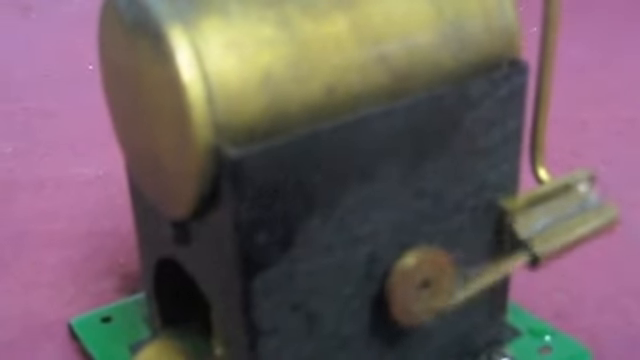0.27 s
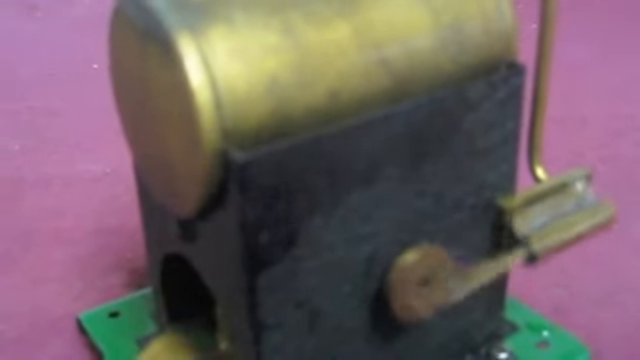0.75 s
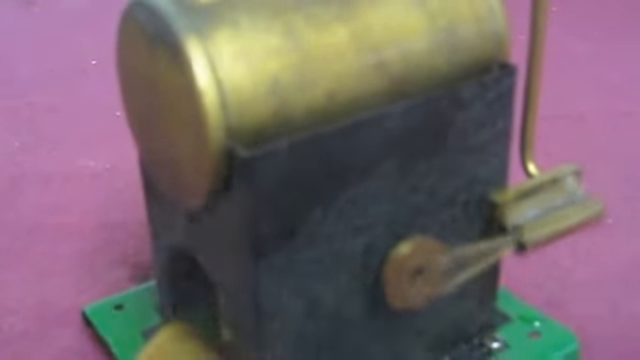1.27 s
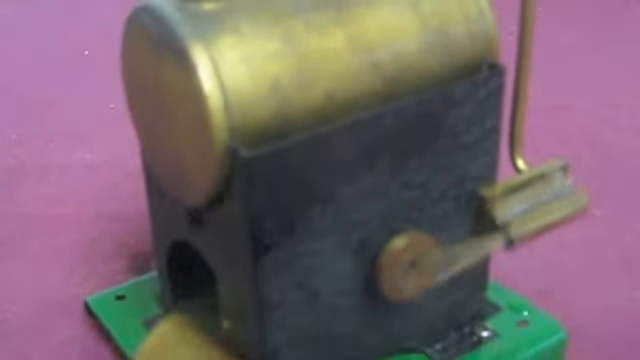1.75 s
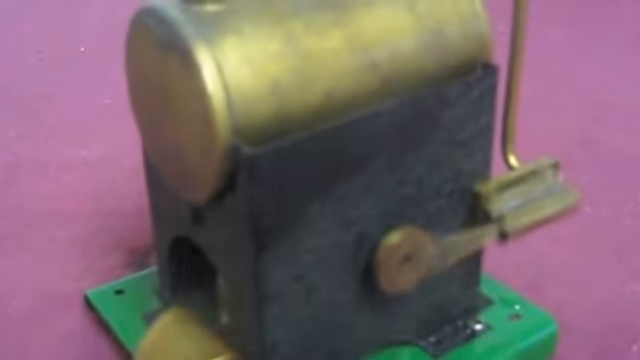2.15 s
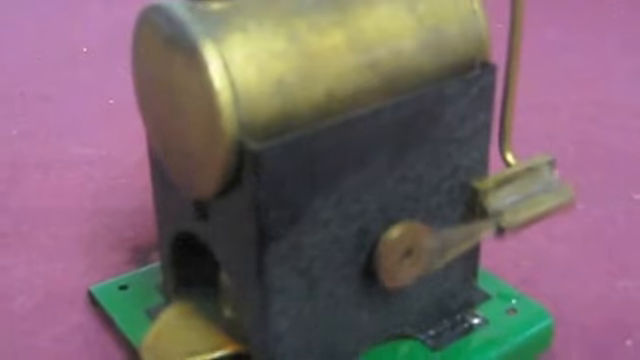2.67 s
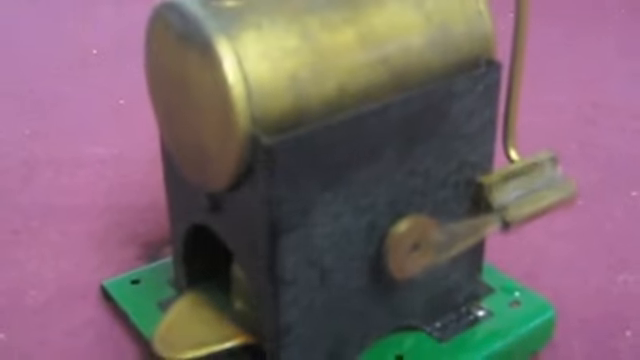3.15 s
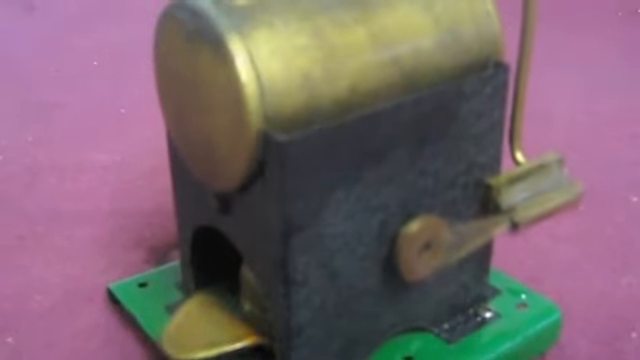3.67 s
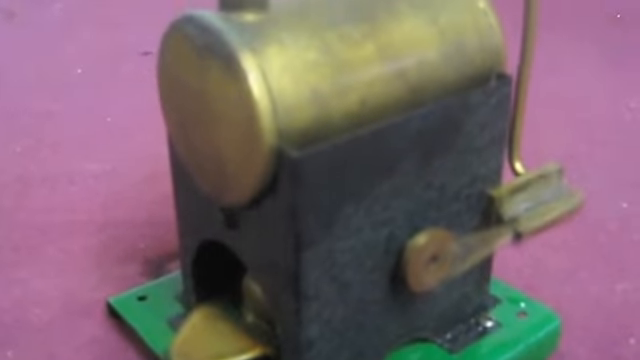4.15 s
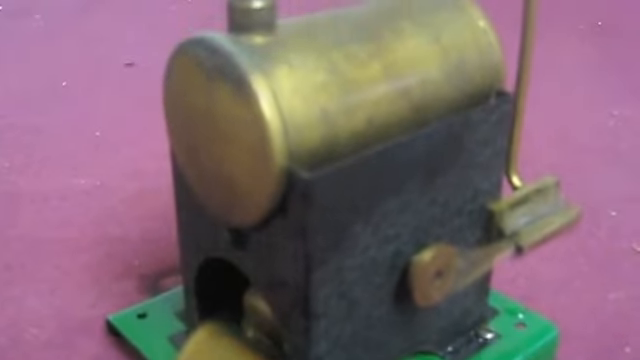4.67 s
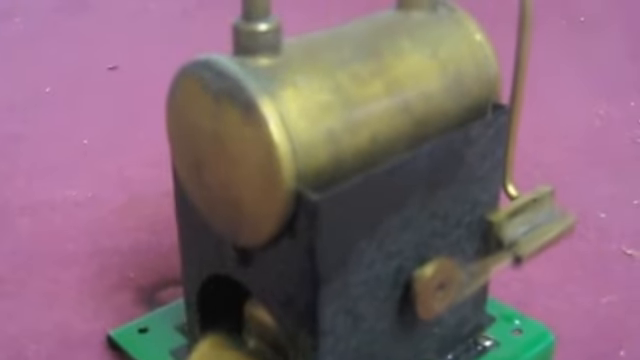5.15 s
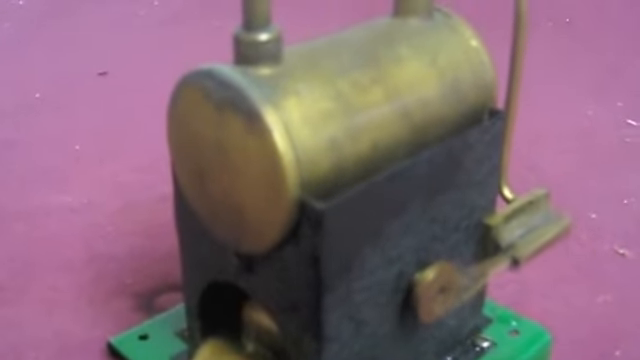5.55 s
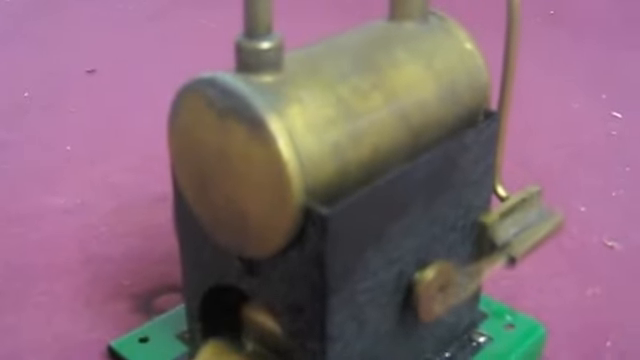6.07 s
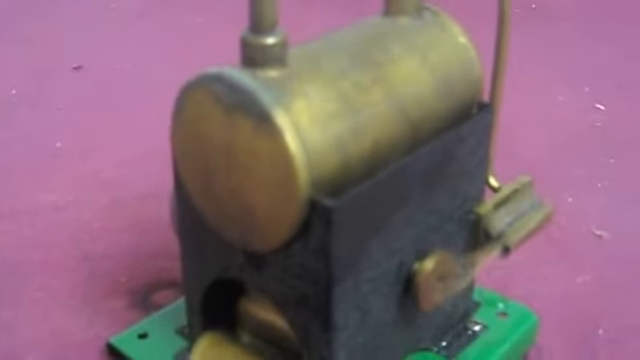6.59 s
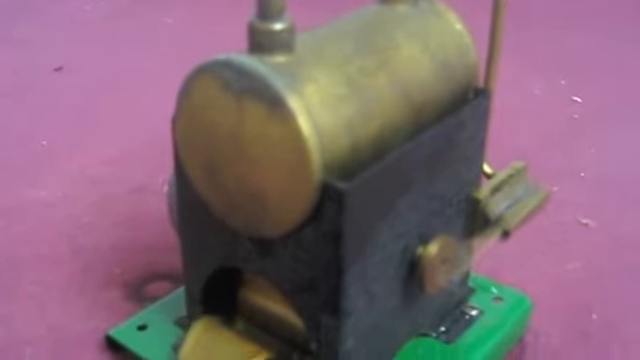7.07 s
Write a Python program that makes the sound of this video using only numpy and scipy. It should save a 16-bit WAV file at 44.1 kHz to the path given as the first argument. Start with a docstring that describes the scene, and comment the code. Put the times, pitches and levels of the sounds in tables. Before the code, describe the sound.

A toy steam engine speeds up close by, sharp wet spits quickening into a buzzing clatter, then clearing into rapid hissing chuffs with a rising whirr.

```python
"""On a table in a small room, close to the microphone, a toy steam engine with one cylinder picks up speed.
At first each exhaust stroke spits condensed water; once the cylinder clears, wet hissing chuffs remain.
Steam is shaped noise: gated by the crank at the exhaust, steady where it leaks at the port face.
Clicks locked to the crank make the water spits, the piston knock, the inlet hiss and a low whirr.
Resonators ring as firebox, boiler and whirr; sines at multiples of the crank speed hum in the table."""
import sys
import numpy as np
from scipy import signal
from scipy.fft import rfft, irfft
from scipy.io import wavfile
from scipy.ndimage import uniform_filter1d

SR = 44100
rng = np.random.default_rng(int(sys.argv[2]) if len(sys.argv) > 2 else 0)


def wav_out(sig):
    """Save sig, one row per channel (or a flat mono array), as 16-bit PCM at SR to the path in sys.argv[1]."""
    wavfile.write(sys.argv[1], SR, np.round(np.clip(np.atleast_2d(sig).T, -1, 1) * 32767).astype(np.int16))


N = 322812
TIME_S = np.arange(N) / SR

# the crank gathers speed, ever more slowly: (time [s], speed [turns/s])
CRANK_SPEED = [(0, 15.933), (.75, 20.343), (1.75, 25.214), (2.75, 29.084), (3, 29.87), (3.75, 32.844),
               (5.25, 36.751), (5.75, 38.416), (6.5, 39.784), (7.32, 40.568)]
START_TURN = 0.113   # crank angle at the start [turns]
WORKING_SPEED = 38   # [turns/s]
# the cylinder is flooded at first, then blows itself clear: when, and how long the steam takes to change [s]
CLEARS_S, CLEARING_S = 2.3, 0.04


def from_db(db):
    """Decibels to an amplitude factor."""
    return 10 ** (np.asarray(db) / 20)


def columns_at(rows, where):
    """Every further column of a table, read along its first one."""
    first, *columns = np.transpose(rows)
    return [np.interp(where, first, column) for column in columns]


def in_time(rows):
    """Every column of a table that runs in seconds, at each sample."""
    return columns_at(rows, TIME_S)


def with_speed(working_db, slope_db):
    """A level that grows with the speed of the crank, by slope_db per turn/s."""
    speed, = in_time(CRANK_SPEED)
    return working_db + slope_db * (speed - WORKING_SPEED)


def colour(x, spectrum):
    """Causal (minimum-phase) filter that leaves the power of white noise unchanged."""
    size = 4096
    hz, db = np.transpose(spectrum)
    bins_hz = np.linspace(1, SR / 2, size // 2 + 1)
    gain = from_db(np.interp(np.log(bins_hz), np.log(hz), db))
    # folding the cepstrum onto positive times gives the minimum phase
    cepstrum = irfft(np.log(gain))
    cepstrum[1:size // 2] *= 2
    cepstrum[size // 2 + 1:] = 0
    response = irfft(np.exp(rfft(cepstrum)))
    return signal.fftconvolve(x, response / np.linalg.norm(response))[:N]


def resonance(x, hz, width_hz):
    """Two-pole band-pass with a gain of about 1 on top; a narrow one rings long."""
    r = np.exp(-np.pi * width_hz / SR)
    feed = np.array([1, 0, -1]) * (1 - r * r) / 2
    feedback = [1, -2 * r * np.cos(2 * np.pi * hz / SR), r * r]
    return signal.lfilter(feed, feedback, x + 1e-18)


def fade(clicks, decay_s):
    """Each click becomes a step that dies away exponentially."""
    return signal.lfilter([1], [1, -np.exp(-1 / (decay_s * SR))], clicks + 1e-18)


def sputter(rough_db, grain_hz):
    """Jet noise broken into short spurts by droplets; rms 1."""
    spurts = np.clip(rng.standard_normal(N), -2, 2)
    swing = np.interp(np.arange(N) * grain_hz / SR, np.arange(N), spurts)
    x = rng.standard_normal(N) * from_db(rough_db * swing)
    return x / x.std()


def per_turn(turns, spread_db):
    """A random strength for each turn: no two strokes are equally strong."""
    strengths = from_db(spread_db * rng.standard_normal(size=400))
    return strengths[np.maximum(turns, 0).astype(int)]


def once_a_turn(turns, angle):
    """A unit click each time the crank passes an angle (in turns)."""
    passed = np.floor(turns - angle)
    return np.diff(passed, prepend=passed[0])


def exhaust(turns):
    """The port opens once a turn: a chuff of steam with fine spray in it, whistling as the pressure rises."""
    # flow over one turn: (crank angle [turns], level running clear [dB], level waterlogged [dB])
    chuff_flow = [(0, -10, -11), (.28, -33, -58), (.38, -19, -0.5), (.48, -14.5, 0.5), (.55, -4, 2.5),
                  (.63, 0, 1), (.72, 1, -14.5), (.8, -7.5, -15), (.88, -8, -32), (1, -12, -53)]
    spray_flow = [(0, -15, -21), (.3, -23, -25), (.37, -22, 2), (.49, -15, -14), (.56, -2.5, -1),
                  (.635, -9.5, 9.5), (.68, 5.5, -8), (.74, -5.5, -13), (.82, -12, -7), (.92, -18, -31),
                  (1, -34, -25)]
    # colours of steam and spray: (frequency [Hz], relative level per Hz [dB])
    chuff_colour = [(40, -38), (200, -30.5), (430, -23), (560, -9), (880, -15.5), (1100, -5), (1330, -6.5),
                    (1550, 1), (2700, 1), (4000, -2.5), (4900, -6), (6500, -5.5), (9000, -11), (16000, -32)]
    spray_colour = [(500, -54), (3000, -6.5), (6000, 0.5), (9000, 2), (11500, 8.5), (13200, 4), (14500, 6),
                    (15700, -15)]
    # strength of the chuff: (time [s], level [dB])
    chuff_level = [(0, -22), (2.25, -23), (2.36, -17.5), (2.6, -21.5), (4.5, -23), (4.9, -20.5), (5.6, -21),
                   (5.95, -25), (7.32, -26)]
    # water left in the cylinder: (time [s], share [0-1])
    water_left = [(0, 0.71), (1.2, 0.8), (2.29, 0.43), (2.35, 0.37), (3.1, 0.01), (7.32, 0.3)]
    # lateness of the exhaust: (time [s], crank angle [turns])
    lateness = [(0, 0.0014), (1.3, -0.027), (2.29, -.005), (2.36, -0.0071), (3.1, -0.0046), (4.6, 0.025),
                (5, 0.064), (5.9, 0.04), (7.32, 0.00021)]
    # tones of the exhaust port: (frequency [Hz], width [Hz], level [dB])
    port_tones = [(3800, 370, 1), (6450, 150, 2.5)]
    # how hard the rising pressure blows those tones: (time [s], level [dB])
    port_drive = [(0, -49), (5.8, -44), (6.4, -20.5), (6.8, -17), (7.32, -14)]
    sizzle_hz, sizzle_width_hz = 15350, 1700
    spray_flooded_db, spray_clear_db = -34, -24
    (water,), (late,), (drive_db,) = in_time(water_left), in_time(lateness), in_time(port_drive)
    chuff_db, = in_time(chuff_level)

    def flow(table):
        """Flow through the port, between its clear and its waterlogged course."""
        clear, wet = columns_at(table, (turns - late) % 1)
        return from_db(clear + water * (wet - clear))

    chuff = sputter(rough_db=2.0, grain_hz=1300) * flow(chuff_flow) * per_turn(turns, spread_db=0.4)
    chuff = colour(chuff * from_db(chuff_db), chuff_colour)
    spray_db = np.interp(TIME_S, [CLEARS_S, CLEARS_S + CLEARING_S], [spray_flooded_db, spray_clear_db])
    spray = sputter(rough_db=1.5, grain_hz=979) * flow(spray_flow) * per_turn(turns, spread_db=0.84)
    spray = colour(spray * from_db(spray_db), spray_colour)
    edge = rng.standard_normal(N) * flow(chuff_flow) * from_db(drive_db)
    whistle = sum(from_db(db) * resonance(edge, hz, width_hz) for hz, width_hz, db in port_tones)
    sizzle_db = with_speed(working_db=-16.5, slope_db=0.3)
    mist = sputter(rough_db=3.0, grain_hz=900) * flow(spray_flow) * from_db(sizzle_db)
    sizzle = resonance(mist, sizzle_hz, sizzle_width_hz)
    sizzle = resonance(sizzle, sizzle_hz, sizzle_width_hz)   # second pass for steeper skirts
    return chuff + spray + whistle + sizzle


def port_leak():
    """Steam leaks at the port face: a rough hiss that goes on through the whole turn."""
    # strength of the leak: (time [s], level [dB])
    leak_level = [(0, -34), (.8, -36), (2.27, -37), (2.36, -29.5), (4.6, -32.5), (5.3, -29), (6.3, -33.5),
                  (6.8, -30.5)]
    # its colour: (frequency [Hz], relative level per Hz [dB])
    leak_colour = [(40, -30.5), (200, -29.5), (430, -22.5), (560, -14.5), (880, -15), (1100, -3),
                   (1330, -9), (1550, 0), (2600, -2), (3400, -6.5), (4800, -9), (6500, -11), (11000, -23.5),
                   (16000, -20)]
    leak_db, = in_time(leak_level)
    return from_db(leak_db) * colour(sputter(rough_db=3.5, grain_hz=693), leak_colour)


def pressure_surges():
    """The steam comes in uneven surges: a slow random swing of its gain."""
    surge_db, surges_per_s = 1.24, 7
    swing = np.interp(np.arange(N) * surges_per_s / SR, np.arange(N), rng.standard_normal(N))
    return from_db(surge_db * swing)


def shell(shaking):
    """Tin firebox and brass boiler ring along at their own modes."""
    # modes: (frequency [Hz], width [Hz], level added to the direct sound [dB])
    shell_modes = [(744, 32, 5), (1503, 85, -2.5), (2023, 31, 0), (4200, 120, -0.5), (8890, 380, 3),
                   (9770, 120, 0)]
    return sum(from_db(db) * resonance(shaking, hz, width_hz) for hz, width_hz, db in shell_modes)


def table_hum(turns):
    """The unbalanced crank and piston hum through the table at multiples of the crank speed."""
    # strength of the hum: (time [s], level [dB])
    hum_level = [(0, -85), (2.6, -75), (4.3, -73), (5.4, -65.5), (6.4, -69.5), (7.32, -66.5)]
    # unbalance: (multiple of the crank speed, level [dB])
    hum_orders = [(2, 2.6), (3, .7), (4, -4), (5, -3), (6, -5), (7, 3.7), (8, 3), (9, -.4), (10, -.4),
                  (11, 1), (12, 1.8)]
    # how well the table radiates: (frequency [Hz], level [dB])
    table_response = [(60, -10.6), (80, -.7), (95, -6.7), (112, 8.4), (135, 4), (160, 5.8), (190, 0),
                      (230, 2), (270, -2.4), (330, 2), (400, -3.3), (480, 1.7)]
    (speed,), (hum_db,) = in_time(CRANK_SPEED), in_time(hum_level)
    hum = np.zeros(N)
    for order, order_db in hum_orders:
        table_db, = columns_at(table_response, order * speed)
        phase = 2 * np.pi * (order * turns + rng.random())
        hum += from_db(hum_db + order_db + table_db) * np.sin(phase)
    return np.sqrt(2) * hum   # levels are rms


def room_rumble():
    """Steady low noise of the room."""
    # its colour: (frequency [Hz], relative level per Hz [dB])
    rumble_colour = [(20, 13), (60, 19), (150, -15), (400, -21), (2000, -31)]
    return from_db(-83) * colour(rng.standard_normal(N), rumble_colour)


def room(x):
    """A short diffuse tail that has lost its treble at the walls."""
    t60_s, level_db = 0.25, -20
    t = np.arange(SR // 2) / SR
    tail = rng.standard_normal(len(t)) * from_db(-60 * t / t60_s) * (t > 0.004)
    wet = signal.fftconvolve(x, tail / np.linalg.norm(tail))[:N]
    return from_db(level_db) * signal.sosfilt(signal.butter(2, 5000, fs=SR, output="sos"), wet)


def slugs_of_water(turns):
    """Crack and thump clicks: a crack a turn while flooded, most with a low thump under it; then faint low
    thumps, one a turn, fading; a few strays."""
    # flooded turns whose crack comes with little low thump: time [s]
    weak_thumps = [.093, .695, .745, .794, .891, .984, 1.076, 1.254, 1.592, 1.675, 2.214]
    # stray slugs after the cylinder has cleared: (time [s], crack [dB], thump [dB])
    late_spits = [(3.845, -14, -44), (3.875, -10, -42), (4.466, -11, -50)]
    spit_turn, delay_per_s, draining_s = 0.611, 0.045, 1.5   # [turns], [turns/s], [s]
    crack_db, crack_fade_db_per_s, thump_db = -4.5, 1.53, -35.5
    thump_loss_db, crack_gain_db = 22, 0.5   # less thump, a slightly louder crack
    faint_thump_db, faint_fade_db_per_s = -46, 8
    flooded = TIME_S < CLEARS_S
    # the slug leaves later in the turn as the water drains
    angle = spit_turn + delay_per_s * np.clip(TIME_S - draining_s, 0, 2)
    shots = once_a_turn(turns, angle)
    weak = np.isin(np.floor(turns), np.floor(np.interp(weak_thumps, TIME_S, turns)))
    fading_db = faint_thump_db - faint_fade_db_per_s * (TIME_S - CLEARS_S)
    weight_db = np.where(flooded, thump_db - thump_loss_db * weak, fading_db)
    snap_db = crack_db - crack_fade_db_per_s * TIME_S + crack_gain_db * weak
    cracks = shots * flooded * from_db(snap_db)
    thumps = shots * from_db(weight_db)
    for s, stray_crack_db, stray_thump_db in late_spits:
        at = int(s * SR)
        cracks[at], thumps[at] = from_db(stray_crack_db), from_db(stray_thump_db)
    return cracks, thumps


def spits(turns):
    """A slug of water pops out of the port in a burst of spray that swells and dies within milliseconds."""
    # colour of the crack: (frequency [Hz], relative level per Hz [dB])
    spit_colour = [(100, -38.5), (880, -18.5), (1300, -21), (1550, -3), (2400, 3.5), (3400, -7), (6300, -7),
                   (9200, -11), (10400, -11.5), (11600, -6), (13000, -15), (14500, 1), (16000, -21.5)]
    slugs, thumps = slugs_of_water(turns)
    burst = 0.64 * fade(slugs, decay_s=0.00092) + 0.11 * fade(slugs, decay_s=0.0058)
    burst = uniform_filter1d(burst, size=28)
    pop = 6 * resonance(slugs, hz=2110, width_hz=610)
    low_pass = signal.butter(1, 550, fs=SR, output="sos")
    thump = 100 * signal.sosfilt(low_pass, thumps + 1e-18)
    crack = 0.84 * burst * rng.choice([-1, 1], N) - 1.14 * slugs   # spray round one sharp snap
    return colour(crack, spit_colour) - pop - thump


def low_whirr(turns):
    """Low clicks locked to the crank ring the low modes: a whirr that climbs with speed."""
    # crank angles of the low clicks: (crank angle [turns], level [dB])
    click_angles = [(.041, -6), (.72, -4.5), (.86, 2)]
    # strength of the clicks: (time [s], level [dB])
    click_level = [(0, -6.5), (2.6, -1), (4.8, -1.5), (5.7, 4.5), (7.32, -4.5)]
    # low modes: (frequency [Hz], width [Hz], level [dB])
    low_modes = [(516, 54, -1), (542, 69, 0.5), (600.6, 49, 1), (736, 37, 3), (1040, 71, -0.5),
                 (1177, 13, 6.5)]
    click_db, = in_time(click_level)
    clicks = np.zeros(N)
    for angle, db in click_angles:
        clicks += from_db(db) * once_a_turn(turns, angle) * per_turn(turns, spread_db=1.6)
    clicks *= from_db(click_db)
    whirr = np.zeros(N)
    for k, (hz, width_hz, db) in enumerate(low_modes):
        whirr += (-1) ** k * from_db(db) * resonance(clicks, hz, width_hz)   # alternating sign
    return whirr


def piston(turns):
    """At dead centre the inlet port hisses short and sharp, then the piston takes up its play with a knock."""
    # how hard the loose piston knocks: (time [s], level [dB])
    knock_level = [(.15, -18), (.6, -26), (2.25, -32), (2.36, -28.5), (4.3, -21), (5.15, -31.5), (5.4, -19),
                   (6.45, -20.5), (6.95, -42)]
    # colours of knock and inlet hiss: (frequency [Hz], relative level per Hz [dB])
    knock_colour = [(40, -48), (200, -30), (560, -29), (1100, -17), (1600, -14), (1950, 3), (2300, 2),
                    (2750, -0.5), (3300, -24), (4200, -17), (16000, -20)]
    inlet_colour = [(500, -28), (3000, 3), (6000, -1), (9000, -0.5), (11500, 0.5), (13200, -5), (14500, 9),
                    (15600, -7)]
    inlet_db = np.maximum(with_speed(working_db=-27.5, slope_db=1.5), -33)   # never below -33 dB
    jets = once_a_turn(turns, angle=0.0033) * per_turn(turns, spread_db=0.4) * from_db(inlet_db)
    puff = uniform_filter1d(fade(jets, decay_s=0.0024), size=48)
    hiss = 2.2 * puff * sputter(rough_db=1.0, grain_hz=1585)
    knock_db, = in_time(knock_level)
    strokes = once_a_turn(turns, angle=0.024) * from_db(knock_db) * per_turn(turns, spread_db=0.6)
    rattle = 0.22 * fade(strokes, decay_s=0.002) * rng.standard_normal(N)
    return colour(9.5 * strokes + rattle, knock_colour) + colour(hiss, inlet_colour)


def scene():
    """The crank angle times every part of the stroke; the shell rings along, in a small room."""
    speed, = in_time(CRANK_SPEED)
    turns = START_TURN + np.cumsum(speed) / SR
    steam = pressure_surges() * (exhaust(turns) + port_leak())
    water = spits(turns)
    engine = steam + water + piston(turns)
    shaking = engine + 1.23 * water   # water hammer shakes the metal harder than steam does
    engine = engine + shell(shaking)
    low_end = table_hum(turns) + low_whirr(turns)
    return (engine + room(engine) + low_end + room_rumble())[None]


def record(dry):
    """The sharpest peaks overload softly; the microphone hears little near 8 kHz, and the top is cut."""
    cutoff_hz = 16000
    limited = dry / (1 + (dry / 0.68) ** 4) ** 0.25
    heard = limited - 0.88 * resonance(limited, hz=7766, width_hz=2170)
    return signal.sosfilt(signal.ellip(12, 0.1, 85, cutoff_hz, fs=SR, output="sos"), heard)


dry = scene()
out = record(dry)
wav_out(out)
```